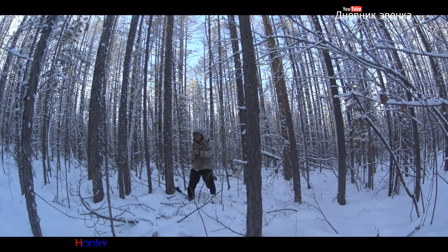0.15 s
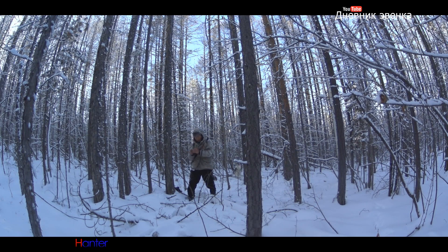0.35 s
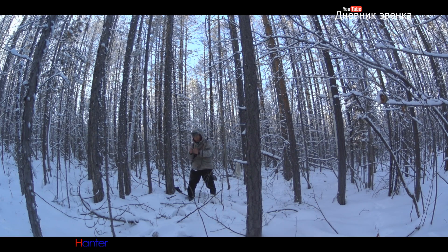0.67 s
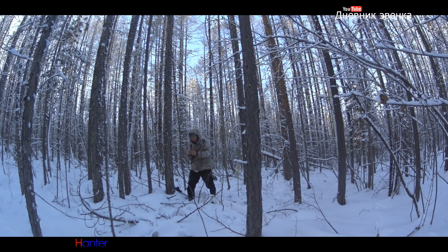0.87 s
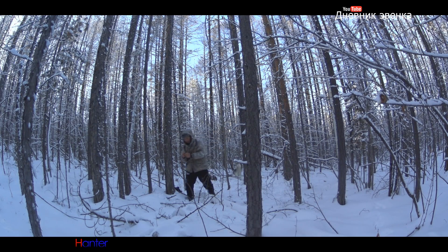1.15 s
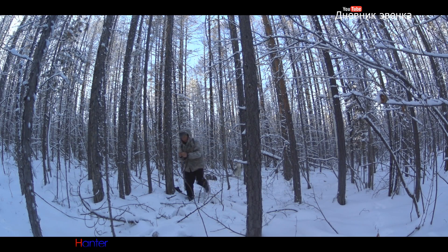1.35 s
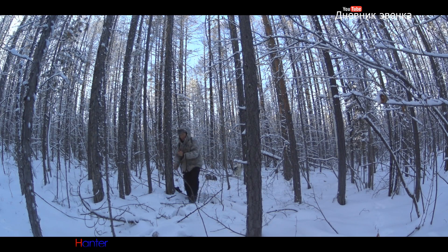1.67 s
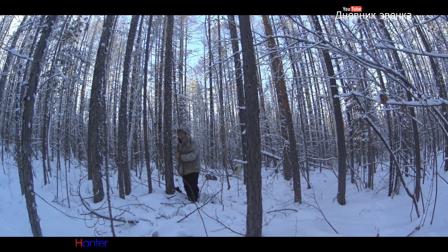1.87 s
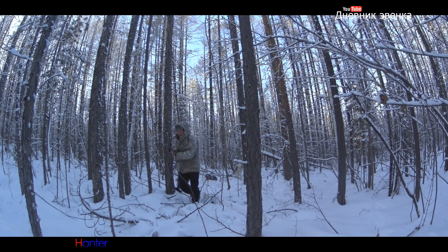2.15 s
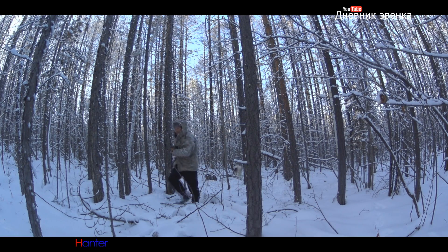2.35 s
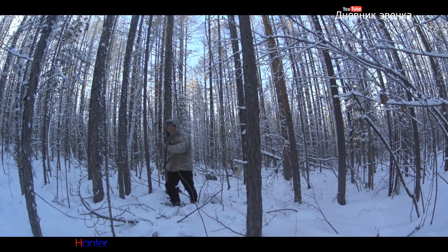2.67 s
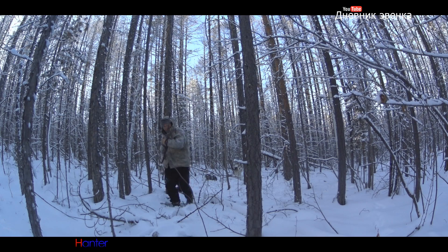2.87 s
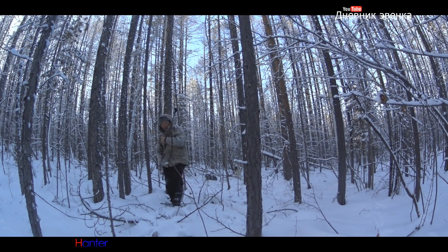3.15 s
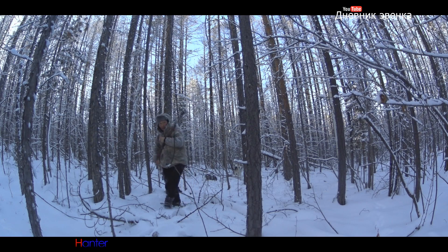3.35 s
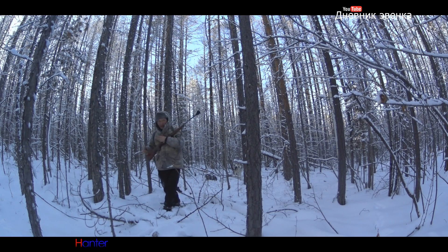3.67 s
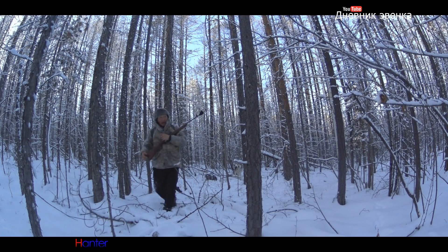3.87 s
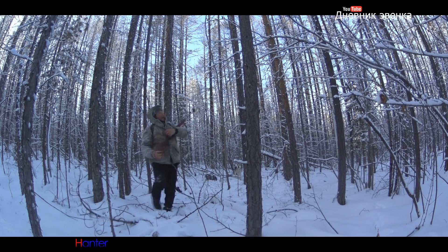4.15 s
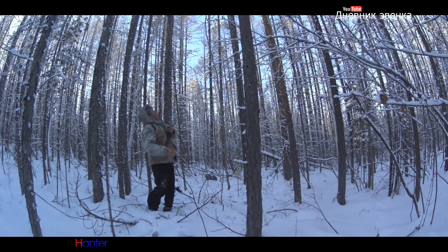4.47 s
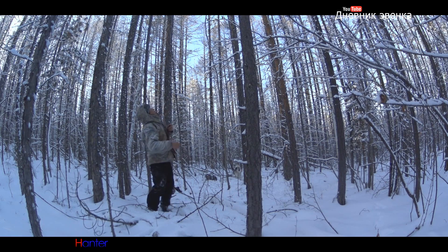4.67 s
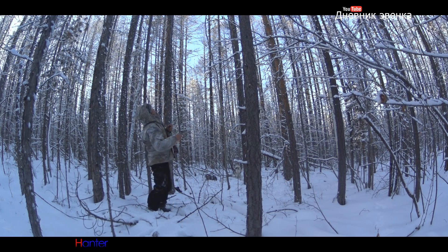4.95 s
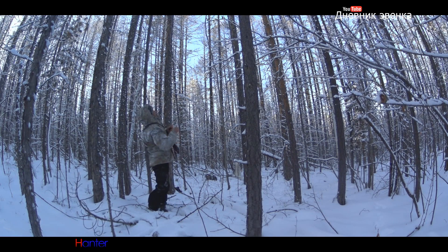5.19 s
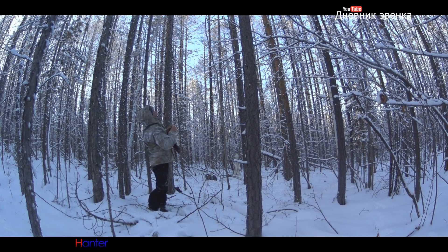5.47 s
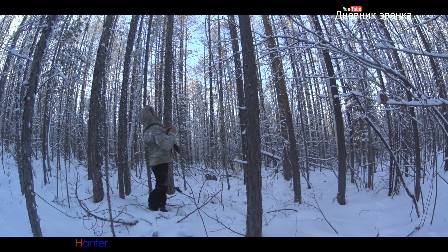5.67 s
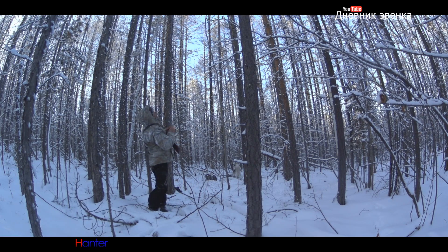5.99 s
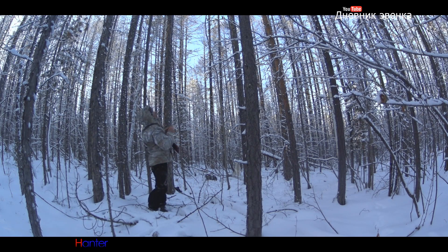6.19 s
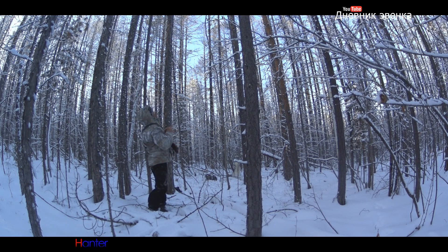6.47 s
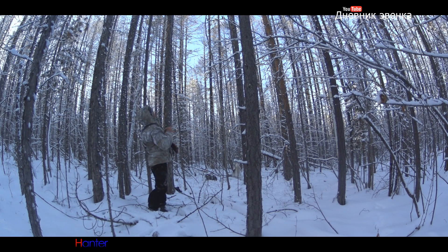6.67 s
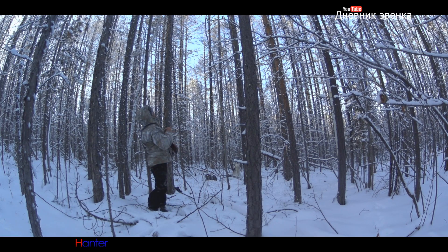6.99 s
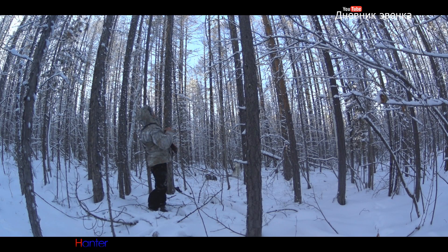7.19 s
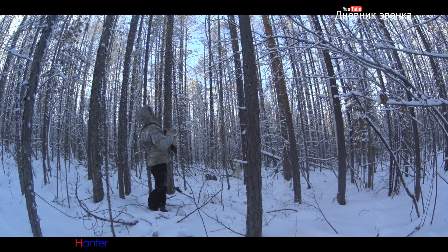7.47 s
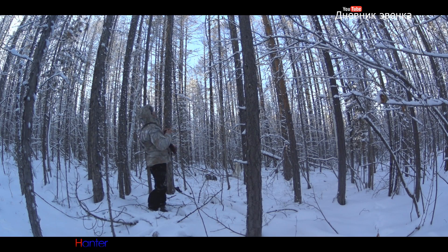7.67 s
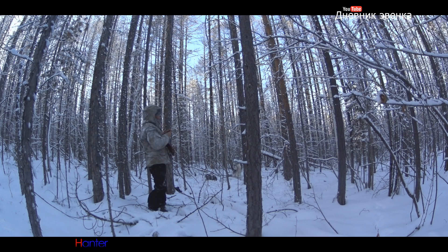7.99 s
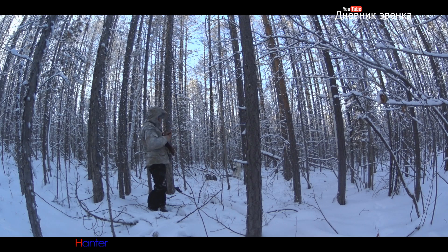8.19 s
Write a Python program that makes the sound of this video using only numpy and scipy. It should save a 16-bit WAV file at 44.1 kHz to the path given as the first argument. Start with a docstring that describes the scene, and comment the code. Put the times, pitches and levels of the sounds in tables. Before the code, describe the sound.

In a quiet winter forest, a nearby dog barks four times, the later barks led in by short, soft growls. It stops for about two seconds while someone steps through swishing, creaking snow and small twigs snap. Then it barks six more times. The barks are loud, rough and a little flattened, just right of the microphone, each ringing away among the trunks, with faint air behind.

```python
"""A snowy forest, a hunting dog close to the microphone and a little to the right, faint air behind.
It barks four times, growling before the last three: each bark a hoarse arch of pitch that clears in
its middle, scattered by the trunks into a long echo. Twigs tick. In the pause, steps swish and creak
in cold snow. Six more barks follow. The microphone's limiter flattens the barks throughout."""
import sys
import numpy as np
from scipy import signal
from scipy.fft import rfft, irfft, next_fast_len
from scipy.io import wavfile
from scipy.ndimage import uniform_filter1d, minimum_filter1d, map_coordinates

SR = 44100
rng = np.random.default_rng(int(sys.argv[2]) if len(sys.argv) > 2 else 0)


def inscribe(sig):
    """Save sig as 16-bit PCM at rate SR to the path in sys.argv[1].

    A 1-D sig is mono; a 2-D sig holds one channel per row.
    Samples are clipped to [-1, 1] before scaling.
    """
    pcm = np.round(np.clip(np.atleast_2d(sig).T, -1, 1) * 32767)
    wavfile.write(sys.argv[1], SR, pcm.astype(np.int16))


N = 367353

# The barks: start/s, end/s, soft start/dB, low pitch/Hz, top pitch/Hz, top at/share of length,
# clearest at/share of length, roughness there/0-1, throat/dB, throat's swell over the bark/dB,
# mouth/dB, rasp/dB, hiss/dB
BARKS = [(0, 0.125, 0.5, 425.7, 489, 0.62, 0.6, 0.11, -34, -0.5, -22.5, -25.5, -40),
         (0.537, .653, -1, 396.3, 446.4, .66, 0.53, 0.11, -30, 4, -21, -29, -44.5),
         (1.232, 1.355, -7, 399.8, 466.7, .47, 0.61, 0.09, -27.5, -13, -19.5, -29.5, -47.5),
         (2.432, 2.559, 0, 421.2, 472.2, .7, 0.54, 0.07, -33, -7.5, -21, -29, -45),
         (4.754, 4.871, -0.5, 418.8, 531.5, .8, 0.33, 0.33, -25.5, 3, -23.5, -27.5, -40),
         (5.203, 5.32, -3.5, 411.9, 458, 0.21, 0.53, 0.27, -25.5, 1, -21, -31, -46.5),
         (6.021, 6.138, -4, 428.3, 477.6, .97, 0.69, 0.42, -24.5, -10.5, -20.5, -32.5, -46),
         (6.638, 6.757, -1.5, 380.8, 460.7, 0.28, 0.32, 0.23, -24, -7.5, -22.5, -33.5, -51),
         (7.486, 7.615, -1.5, 394.7, 427.3, 0.43, 0.49, 0.16, -23.5, 1, -20.5, -31, -49),
         (8.017, 8.14, -2, 410.5, 451, 0.4, 0.63, 0.31, -25, -5, -21, -34, -50.5)]
# Spectrum of snow packing under a boot: f/Hz, level/dB
TREAD = [(30, -16.5), (250, 0.5), (600, 1), (1200, -3), (4000, -47)]


def barks():
    """The dog, close up: vocal fold pulses and turbulence sound through resonances that follow the jaw."""
    # One bark's gesture: time/share of length, effort/dB, jaw opening/dB, resonance scale/ratio
    gesture = [(-.27, -33.5, 6, .74), (-.08, -14, -6.5, 0.795), (.01, 0, -6.5, 0.893),
               (0.201, -0.76, 0.1, 1.117), (.5, -5, 3.5, 1.03), (.92, -0.5, -2, 0.949),
               (1.09, -10, -7.5, 0.927), (1.45, -26, 0, .82)]
    # Spectra of the voice's four layers: f/Hz, level/dB
    throat_shape = [(220, -75), (320, -9.5), (410, -14), (500, 15), (600, 14.5), (720, -16), (900, -38.5)]
    mouth_shape = [(450, -37.5), (680, -1), (860, -2), (1000, -1.5), (1150, -3.5), (1400, -53),
                   (2000, -96.5)]
    rasp_shape = [(900, -25), (1300, -3.5), (1560, 7), (1770, -11), (1950, -5), (2250, -13.5),
                  (2600, -25.5), (4200, -59.5)]
    hiss_shape = [(2500, -35), (3300, -18.5), (4300, -6.5), (4750, 5), (5600, -1), (6700, 4.5),
                  (7400, -17.5), (8800, -1), (11000, -26.5)]
    arch_s, clear_s = .024, .0424  # half-widths of the pitch arch and of the clear tone
    quiver, soft_share = .009, .33  # pitch unsteadiness; share of the bark that a soft start lasts
    out = np.zeros(N)
    for (start, end, soft_db, low_hz, top_hz, top_at, clear_at, core_rough,
         throat_db, swell_db, mouth_db, rasp_db, hiss_db) in BARKS:
        length = end - start
        t = np.arange(start + gesture[0][0] * length, start + gesture[-1][0] * length, 1 / SR)
        t = t[t >= 0]
        share = (t - start) / length
        effort_db, jaw_db, scale = curves(gesture, share)
        arch = np.exp(-((share - top_at) * length / arch_s) ** 2)
        pitch = (low_hz + (top_hz - low_hz) * arch) * (1 + quiver * wobble(70.1, len(t)))
        clear = np.exp(-np.abs((share - clear_at) * length / clear_s) ** 3)
        rough = np.clip(1 + (core_rough - 1) * clear, .05, .97) ** 1.3
        # a fuller throat rings higher, a harder rasp is brighter
        throat = [(hz * (1 + .009 * (throat_db + 29.5)), db) for hz, db in throat_shape]
        tilt_db_per_octave = .7 * (rasp_db + 30)
        rasp = [(hz, db + tilt_db_per_octave * np.log2(hz / rasp_shape[0][0])) for hz, db in rasp_shape]
        # rough folds feed the throat and the rasp more than clean ones
        boom_db = throat_db + 7 * (rough - .5) + swell_db * (np.clip(share, 0, 1) - .5)
        edge_db = rasp_db + 3.5 * (rough - .5)
        # the voice carries best where the folds lock into a clean tone
        effort_db = effort_db + 3.23 * (1 - rough) ** 2 + soft_db * np.clip(1 - share / soft_share, 0, 1)
        # rough folds open at uneven intervals and with uneven force
        phase = 2 * np.pi * np.cumsum(pitch * (1 + .0495 * rough * wobble(247.8, len(t)))) / SR
        pulses = sum(np.cos(k * phase) / k ** .5 for k in np.arange(1, 24))
        pulses = unit(pulses * amp(4 * rough * wobble(220, len(t))))
        flutter = amp(2.6 * wobble(143, len(t)))
        # spectrum, level/dB, share of the jaw's slide, wander of the resonances, turbulence/dB
        layers = [(throat, boom_db, 1, .02, 9),
                  (mouth_shape, mouth_db + jaw_db + .56, .3, .02, 4.5),
                  (rasp, edge_db, .12, .015, 9.5),
                  (hiss_shape, hiss_db + .65 * jaw_db - .14 * effort_db, .4, .05, 10)]
        for shape, db, slide, wander, noise_db in layers:
            turbulence = unit(rng.standard_normal(len(t)) * (1 + .32 * np.cos(phase)) * flutter)
            source = np.sqrt(1 - rough) * pulses + amp(noise_db) * np.sqrt(rough) * turbulence
            voiced = tract(source, shape, scale ** slide * (1 + wander * wobble(36.6, len(t))))
            add(out, t[0], steady(voiced, window_s=.009) * amp(db + effort_db))
        # air whistles thinly past the teeth, drifting in pitch and strength
        whistle_hz = 5350 + 330 * wobble(13, len(t)) + 170 * wobble(900, len(t))
        whistle_db = hiss_db + .42 * effort_db - 10.5 + 4 * wobble(30, len(t))
        add(out, t[0], amp(whistle_db) * np.sin(2 * np.pi * np.cumsum(whistle_hz) / SR))
    return out


def tract(source, shape, scale):
    """The vocal tract's resonances slide: a filter on a clock that runs scale times as fast."""
    clock, samples = np.cumsum(np.clip(scale, .5, 2)), np.arange(len(source))
    stretched = map_coordinates(source, [np.interp(np.arange(clock[-1]), clock, samples)])
    return map_coordinates(coloured(stretched, shape), [clock])


def growls():
    """Slack folds flap slowly, faster as the bark nears; each flap rings the half-closed muzzle."""
    # The growls: start/s, end/s, first level/dB, last level/dB
    spans = [(0.463, 0.527, -51, -45.5), (1.12, 1.23, -52, -46.5), (2.234, 2.424, -57, -42.5)]
    # f/Hz, level/dB, t60/s
    muzzle = [(390, -5, .22), (513, 5.5, .021), (796, 14.5, .007), (1104, -.5, .012), (1560, -5.5, .047)]
    out, t = np.zeros(N), np.arange(SR // 25) / SR
    ring = sum(amp(db - 60 * t / t60) * np.sin(2 * np.pi * hz * t) for hz, db, t60 in muzzle)
    for start, end, first_db, last_db in spans:
        size = int((end - start) * SR)
        flap_hz = np.linspace(62, 90, size) * (1 + .0883 * wobble(60, size))
        cycles = np.floor(np.cumsum(flap_hz) / SR)
        flaps = np.diff(cycles, prepend=-1) * amp(3.5 * wobble(89, size))
        growl = signal.fftconvolve(flaps + .007 * rng.standard_normal(size), ring)[:size]
        add(out, start, unit(growl) * amp(np.linspace(first_db, last_db, size)))
    return signal.sosfilt(signal.butter(4, (300, 2300), "bandpass", fs=SR, output="sos"), out)


def steps():
    """Cold snow creaks underfoot in single slips, each with a dull crunch."""
    # Slips of packed snow: t/s, level/dB
    slips = [(3.866, -31.5), (3.899, -30.5), (3.922, -31), (3.935, -31), (4.172, -29.5), (4.185, -33),
             (4.226, -29.5), (4.249, -31.5), (4.261, -33.5), (4.4, -30.5)]
    # Resonances of the snow crust: f/Hz, width/Hz, level/dB
    crust_modes = [(620, 180, -3.5), (2000, 310, -5), (2950, 180, 0.5), (3620, 630, -6), (7500, 4700, -16)]

    def crust(hz):
        """The crust rings in resonances of alternating sign."""
        return sum((-1) ** k * amp(db) * 1j * hz * width / (centre ** 2 - hz ** 2 + 1j * hz * width)
                   for k, (centre, width, db) in enumerate(crust_modes))

    # a boot sinks in, its slips too dense to tell apart
    sink_s, spread_s = 3.806, .034
    sinking = np.exp(-((np.arange(N) / SR - sink_s) / spread_s) ** 2)
    grind = amp(-44 + 3.1 * wobble(400, N)) * sinking * rng.standard_normal(N)
    creaks = filtered(grind + snaps(slips, attack_s=.0011, t60=.014, tail_db=-33, tail_t60=.036), crust)
    crunches = coloured(snaps(slips, attack_s=.0043, t60=.031, tail_db=-25, tail_t60=.049), TREAD)
    return amp(12.5) * creaks + amp(5) * crunches


def twigs():
    """Frozen twigs snap with a bright tick."""
    # The breaks: t/s, level/dB
    breaks = [(.988, -49), (1.062, -36.5), (1.093, -43), (1.3673, -33.5), (1.93, -25.5), (3.278, -36.5),
              (3.3187, -37.5), (3.43, -41), (4.0836, -30.5), (4.965, -38), (5.0374, -33), (5.5, -42.5)]
    # Spectrum of a break: f/Hz, level/dB
    spectrum = [(200, -31), (1300, -2.5), (11000, 0.5)]
    ticks = snaps(breaks, attack_s=.00066, t60=.0031, tail_db=-10.5, tail_t60=.022)
    return amp(6.5) * coloured(ticks, spectrum)


def snaps(events, attack_s, t60, tail_db, tail_t60):
    """Each break is a quick crack followed by a short crumble."""
    out, t = np.zeros(N), np.arange(SR // 12) / SR
    envelope = (amp(-60 * t / t60) + amp(tail_db - 60 * t / tail_t60)) * (1 - np.exp(-t / attack_s))
    for s, db in events:
        add(out, s, amp(db) * envelope * rng.standard_normal(len(t)))
    return out


def swish():
    """Loose snow brushes past the legs in fine grains and packs under the boots in coarse lumps."""
    # Strength of the brushing: t/s, level/dB
    brushing = [(1.6, -77), (1.88, -61.5), (2.9, -64), (3.2, -70.5), (3.28, -59), (3.55, -57), (3.83, -52),
                (4.02, -57.5), (4.3, -57), (4.55, -51), (4.7, -57.5), (5, -60), (6.1, -74.5)]
    # Spectrum of loose snow: f/Hz, level/dB
    loose_snow = [(100, -12.5), (700, -1), (2300, -0.5), (3200, 0.5), (6000, 0), (8300, 2.5), (10500, -5)]
    level_db, = curves(brushing, np.arange(N) / SR)
    grains = unit(amp(2.4 * wobble(700, N) + 3.4 * wobble(36, N)))
    lumps = unit(amp(6.2 * np.minimum(wobble(130, N), 2) + .72 * wobble(13, N)))
    brushed = amp(level_db + 1.5) * grains * rush(loose_snow)
    packed = amp(.59 * level_db - 25.5) * lumps * rush(TREAD)
    return brushed + packed


def forest(x):
    """Countless trunks each return a small echo to the microphone; the treble dies first."""
    # Decay among the trunks: f/Hz, t60/s
    decay = [(200, 0.93), (520, 1.7), (700, 1.65), (870, 1.43), (1200, 1.23), (5000, 0.77), (10000, 0.52)]
    # Strength of the echo: f/Hz, level/dB
    scatter = [(250, -7.5), (530, 0), (680, -2), (880, 3), (1150, -0.5), (2000, 6), (10000, -1)]
    size = int(1.5 * SR)
    t = np.arange(size) / SR
    shared, own = rng.standard_normal(size), rng.standard_normal((2, size))
    early_swell = (1 - np.exp(-t / .0024)) * (1 + 2.18 * np.exp(-t / .049))
    echoes = (.75 * shared + own) * amp(4.86 * wobble(119.5, size)) * early_swell
    hz, age, bands = signal.stft(echoes, SR, nperseg=256)
    tail = signal.istft(bands * amp(-60 * age / along(decay, hz)[:, None]), SR, nperseg=256)[1]
    tail = coloured(tail, scatter) / np.sqrt(SR * .25)
    return signal.fftconvolve(x[None], tail, axes=1)[:, :N]


def air():
    """The forest air, a faint steady rush behind everything."""
    # Spectrum of the air: f/Hz, level/dB
    spectrum = [(25, 2), (300, -7), (700, 4.5), (2400, -10), (11000, -15.5)]
    return amp(-62) * rush(spectrum)


def rush(spectrum):
    """Stereo noise of rms 1, widest in the mid range."""
    # Stereo width: f/Hz, side relative to middle/dB
    width = [(60, -11), (2000, 2), (8000, -7)]
    mid, side = coloured(rng.standard_normal((2, N)), spectrum)
    side = coloured(side, width)
    return unit(np.array([mid + side, mid - side]))


def amp(db):
    """Decibels to gain."""
    return 10 ** (np.asarray(db) / 20)


def unit(x):
    """Scale to rms 1."""
    return x / np.sqrt(np.mean(x ** 2) + 1e-20)


def steady(x, window_s):
    """x held at rms 1 over a sliding window."""
    return x / np.sqrt(np.abs(uniform_filter1d(x ** 2, max(8, int(window_s * SR)))) + 1e-12)


def along(points, hz):
    """(f/Hz, value) points read at hz on a log axis."""
    f, v = np.transpose(points)
    return np.interp(np.log(hz + 1), np.log(f + 1), v)


def curves(rows, t):
    """Each column after the time, read at the times t."""
    s, *cols = np.transpose(rows)
    return [np.interp(t, s, c) for c in cols]


def wobble(rate, size):
    """A smooth random curve, rate knots a second."""
    return map_coordinates(rng.standard_normal(int(size * rate / SR) + 4), [np.arange(size) * rate / SR])


def filtered(x, response):
    """x times a complex response of frequency."""
    size = x.shape[-1]
    padded = next_fast_len(size + 4096)
    return irfft(rfft(x, padded) * response(np.fft.rfftfreq(padded, 1 / SR)), padded)[..., :size]


def coloured(x, points):
    """x through a (f/Hz, level/dB) spectrum."""
    return filtered(x, lambda hz: amp(along(points, hz)))


def add(track, s, x):
    """Mix x into the track from time s."""
    start = max(0, round(s * SR))
    part = track[start:start + len(x)]
    part += x[:len(part)]


def scene():
    """The dog stands a little to the right and shifts between barks, so each has its own echo."""
    # The dog at the microphone's two ports: f/Hz, phase lead of the left/rad
    lead = [(100, -0.21), (500, -0.86), (2300, -1.02), (5000, -0.44)]
    dog, feet = barks() + growls(), steps() + twigs()
    sides = np.array([[1], [-1]])
    direct = filtered(dog, lambda hz: np.exp(.5j * along(lead, hz) * sides)) * amp([[.2], [1.6]])
    shifts_s = [start - .2 for start, *_ in BARKS[1:]]
    stance = np.searchsorted(shifts_s, np.arange(N) / SR)
    echo = sum(forest((dog + amp(-8.5) * feet) * (stance == k)) for k in range(len(BARKS)))
    return direct + feet + amp(-11.5) * echo + swish() + air()


def record(dry):
    """A fast limiter behind the microphone holds the peaks down; a steep low-pass ends the treble."""
    ceiling, top_hz = .25, 11200
    needed = np.minimum(1, ceiling / (np.abs(dry.mean(axis=0)) + 1e-9))
    gain = uniform_filter1d(minimum_filter1d(needed, size=220, origin=80), size=40)
    return filtered(dry * gain, lambda hz: 1 / (1 + (hz / top_hz) ** 120))


dry = scene()
out = record(dry)
inscribe(out)
```